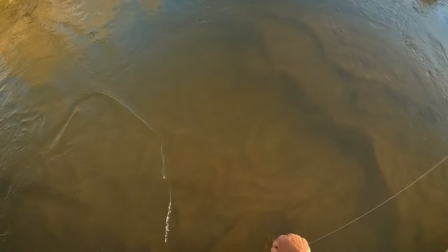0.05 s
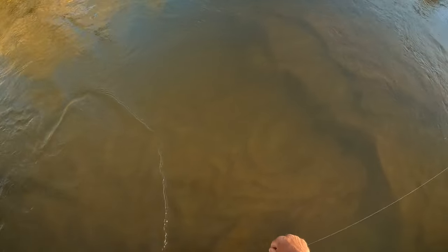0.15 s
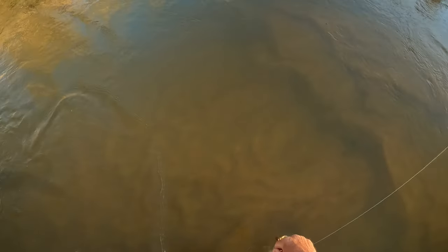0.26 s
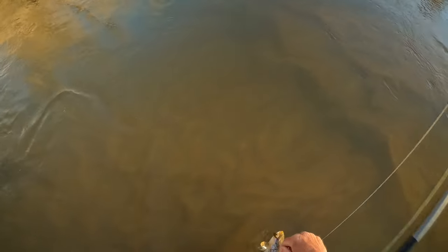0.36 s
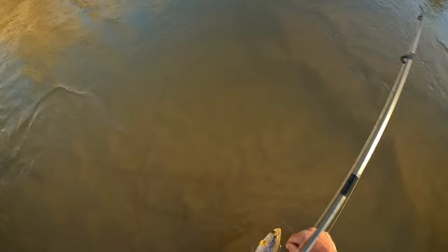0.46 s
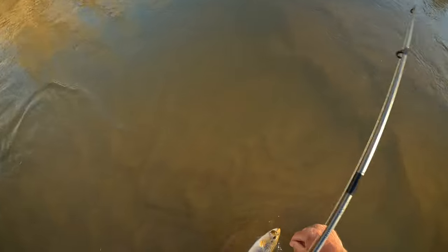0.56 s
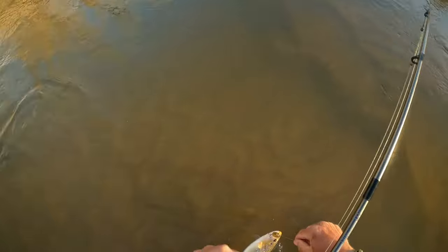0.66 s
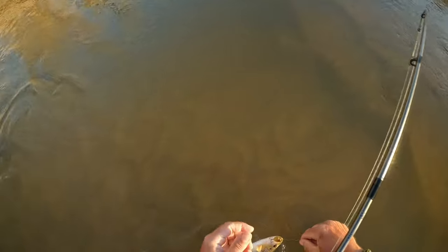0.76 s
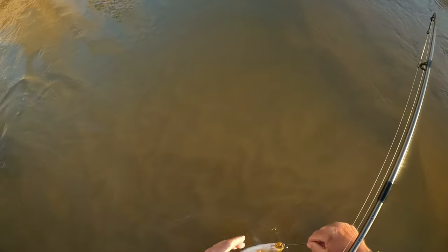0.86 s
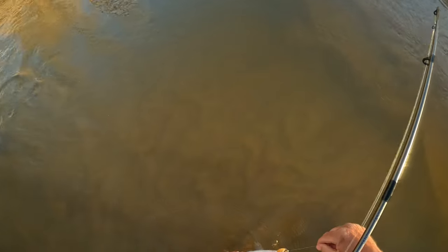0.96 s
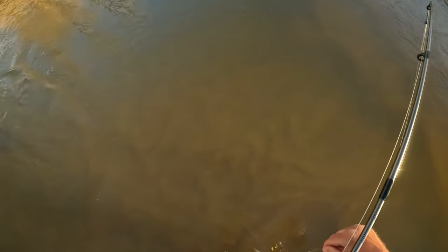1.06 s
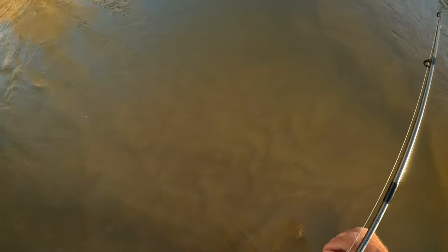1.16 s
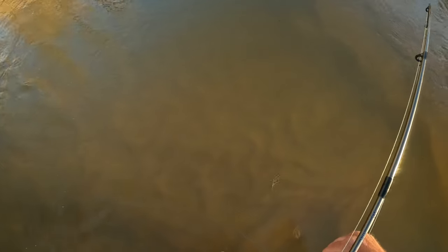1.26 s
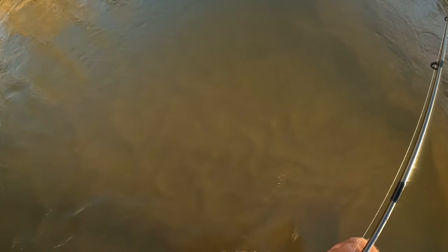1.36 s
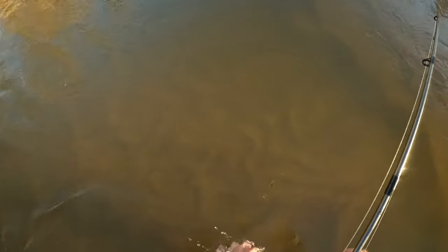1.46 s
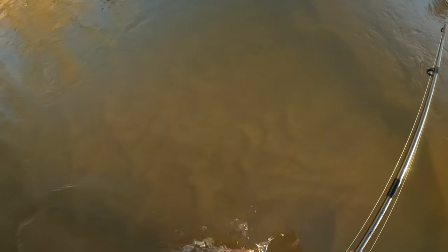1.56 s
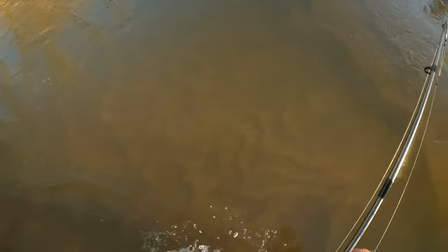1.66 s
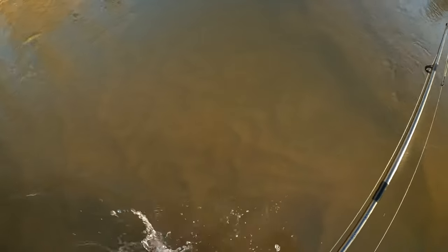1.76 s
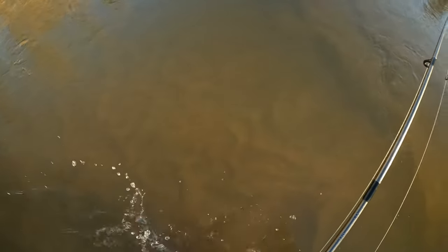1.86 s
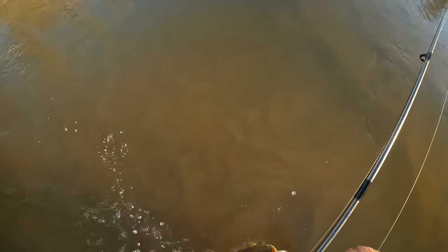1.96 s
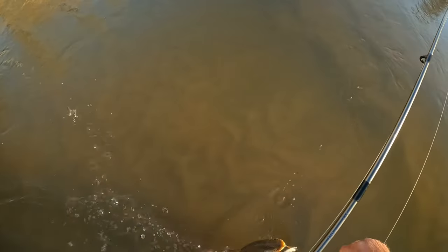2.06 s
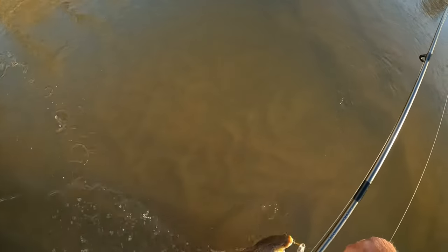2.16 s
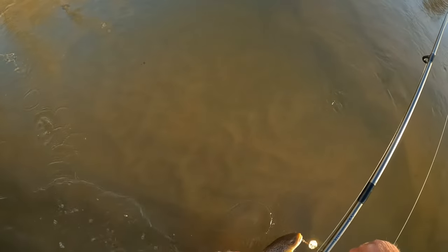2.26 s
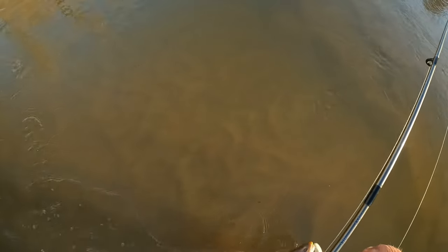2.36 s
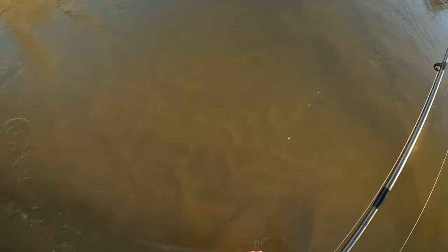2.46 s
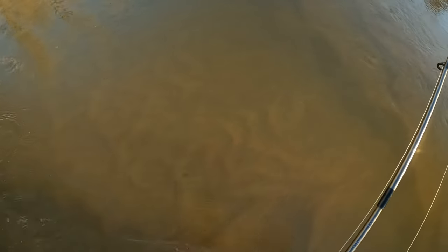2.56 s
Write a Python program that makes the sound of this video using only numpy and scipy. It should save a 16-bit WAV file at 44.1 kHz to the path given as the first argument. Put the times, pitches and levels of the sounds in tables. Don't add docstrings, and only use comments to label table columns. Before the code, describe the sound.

Close fish splashing on a stream: light line and finger knocks first, a sudden burst of slaps, churned water and faint metal jingle, then drops and a gulp, over quiet insects and wind buffeting.

```python
import sys
import numpy as np
from scipy import signal
from scipy.fft import rfft, irfft, next_fast_len
from scipy.io import wavfile
from scipy.ndimage import map_coordinates

SR = 44100
rng = np.random.default_rng(int(sys.argv[2]) if len(sys.argv) > 2 else 0)


def digitize_waveform(pressure):
    field = np.atleast_2d(pressure).T
    bounded = np.clip(field, -1, 1)
    quanta = np.round(bounded * 32767).astype(np.int16)
    wavfile.write(sys.argv[1], SR, quanta)


def invert_db(level):
    return 10 ** (np.asarray(level, dtype=float) / 20)


N = 114660

# frequency_hz, gain_db
CASE_COLOUR = [(6900, 2.5), (7700, -9), (13000, -9.5), (15000, -43)]


def unit(x):
    return x / np.sqrt(np.mean(x ** 2) + 1e-20)


def along(points, hz):
    f, v = np.transpose(points)
    return np.interp(np.log(hz + 1), np.log(f + 1), v)


def curves(rows):
    s, *cols = np.transpose(rows)
    return [np.interp(np.arange(N) / SR, s, c) for c in cols]


def wobble(rate):
    knots = rng.standard_normal(int(N * rate / SR) + 4)
    return map_coordinates(knots, [np.arange(N) * rate / SR])


def filtered(x, response):
    m = next_fast_len(x.shape[-1] + 8192)
    spectrum = rfft(x, m) * response(np.fft.rfftfreq(m, 1 / SR))
    return irfft(spectrum, m)[..., :x.shape[-1]]


def rush(spectrum, alike):
    def mid_side(hz):
        turn = np.arccos(np.clip(along(alike, hz), -1, 1)) / 2
        return invert_db(along(spectrum, hz)) * [np.cos(turn), np.sin(turn)]

    mid, side = filtered(rng.standard_normal((2, N)), mid_side)
    return unit(np.array([mid + side, mid - side]))


def add(track, s, sound, pan_db):
    part = track[:, round(s * SR):][:, :len(sound)]
    part += invert_db(np.array([[pan_db / 2], [-pan_db / 2]])) * sound[:part.shape[1]]


def grains(level_db, centre_hz, spread, cycles, size_db, count):
    u, t = rng.random((count, 3)), np.arange(500) / SR
    hz = np.clip(centre_hz * np.exp(spread * rng.standard_normal(count)), 300, 13000)[:, None]
    start = (u[:, 0] * (N - 500)).astype(int)
    size = invert_db(level_db[start] - size_db * np.log(u[:, 1] + 0.0019))[:, None]
    tone = np.sin(2 * np.pi * hz * t * (1 + 0.0036 * hz * t))
    shape = (1 - np.exp(-2 * hz * t)) * np.exp(-hz * t / cycles) * (1 - t / t[-1])
    ring = size * tone * shape
    where = (start[:, None] + np.arange(500)).ravel()
    pan_db = 3.8 * (u[:, 2:] - .5)
    return np.array([np.bincount(where, (ring * invert_db(side * pan_db)).ravel(), N) for side in (1, -1)])


def pockets():
    # start_s,
    # peak_db, pitch_hz, t60_s, pitch_rise_per_s
    early = [(.037, -32, 896, 0.083, 8.5), (0.111, -23.5, 1078, 0.021, -18), (0.11, -37.5, 146, 0.037, -2),
             (0.185, -37, 1254, 0.033, 19), (0.58, -16, 1380, 0.0067, 8), (0.6258, -24.5, 1117, 0.023, 6),
             (0.631, -33, 335, 0.035, -11), (0.641, -34, 175, 0.061, 1), (1.088, -45, 280, 0.025, 0),
             (1.409, -35, 297, 0.025, 5), (1.033, -46, 1050, 0.16, -2), (1.547, -34.5, 1165, 0.13, 6),
             (1.573, -10, 308, 0.0076, 90), (1.583, -23, 1770, 0.025, 8), (1.594, -28.5, 478, 0.064, 46.5),
             (1.616, -34.5, 517, 0.088, 8), (1.6827, 4, 4170, 0.0011, 3.3), (1.759, -19.5, 229, .05, 9),
             (1.7669, -2.5, 305, 0.031, -5.5), (1.775, -21.5, 260, 0.12, 5),
             (1.78, -23.5, 148, 0.093, 20.5), (1.802, -14, 459, 0.066, 52.5), (1.813, -28, 314, 0.15, 7.5),
             (1.849, -17, 560, 0.023, 5.8), (1.865, -28, 333, 0.098, 3), (1.873, -16.5, 905, 0.034, 8),
             (1.889, -13.5, 956, 0.018, 9), (1.892, -23.5, 337, 0.067, 3.2), (1.986, -29.5, 380, 0.027, 5),
             (2.012, -32, 1325, 0.071, 2.5)]
    # start_s, peak_db, pitch_hz, t60_s, pitch_rise_per_s
    late = [(2.064, -37, 895, 0.069, 5.5), (2.121, -41, 980, 0.068, 19.5), (2.057, -27, 1850, 0.021, -2),
            (2.211, -32.5, 1850, 0.033, 25), (2.315, -30.5, 1777, 0.043, 9.5),
            (2.328, -30, 1290, 0.044, 7.5), (2.524, -45.5, 480, 0.086, 7.5),
            (2.529, -31.5, 1200, 0.03, 2.5), (2.543, -32.5, 2100, 0.053, 11.5),
            (2.556, -34.5, 424, 0.71, 1.7), (2.59, -26, 457, 0.019, 9)]
    track, t = np.zeros((2, N)), np.arange(SR // 4) / SR
    shake = wobble(70), wobble(90)
    for s, db, hz, t60, rise in early + late:
        unsteady = np.clip(t / 0.051, 0, 1)
        sway, swell = [np.resize(v[round(s * SR):], len(t)) * unsteady for v in shake]
        tone = invert_db(0.83 * swell) * np.sin(2 * np.pi * hz * t * (1 + rise * t / 2) + 1.05 * sway)
        envelope = invert_db(db - 60 * t / t60) * (1 - np.exp(-t * hz / 0.44))
        add(track, s, envelope * tone, -.7)
    return track


def gulp():
    # time_s, pitch_hz, level_db
    hollow = [
        (2.295, 291, -64),
        (2.308, 289, -34.5),
        (2.355, 306, -41.5),
        (2.375, 302.4, -33),
        (2.414, 416, -35),
        (2.459, 636, -43.5),
    ]
    hz, level_db = curves(hollow)
    first_s, last_s = hollow[0][0], hollow[-1][0]
    span = np.abs(np.arange(N) / SR - (first_s + last_s) / 2) < (last_s - first_s) / 2
    turn = 2 * np.pi * np.cumsum(hz) / SR + 0.21 * wobble(70)
    level = invert_db(level_db - 6.5 + 1.4 * wobble(90))
    return span * level * (np.sin(turn) + 0.084 * np.sin(2 * turn))


def bursts(rows, sharp, wide_db, t60, rise_s):
    track, t = np.zeros((2, N)), np.arange(SR // 6) / SR
    for s, db, hz in rows:
        def colour(f):
            peak = 1j * f * hz / sharp / (hz * hz - f * f + 1j * f * hz / sharp)
            skirt = 1j * f / (400 + 1j * f) / (1 + 1j * f / (6.8 * hz))
            return peak + invert_db(wide_db) * skirt

        puff = rng.standard_normal(len(t)) * invert_db(-60 * t / t60) * (1 - np.exp(-t / rise_s))
        puff = filtered(puff, colour)
        add(track, s, invert_db(db) * puff / np.abs(puff).max(), rng.normal(-0.58, 1))
    return track


def slaps():
    # start_s, peak_db, centre_hz
    hits = [(1.488, -31, 3400), (1.513, -21, 4570), (1.561, -25, 2630), (1.685, -14, 5400),
            (1.736, -14.5, 7600), (1.763, -14.5, 4000), (1.737, -8, 11500), (1.891, -10.5, 3000),
            (2.056, -25.5, 2530), (2.211, -30, 2495), (2.262, -30.5, 5600), (2.3235, -23.5, 4020),
            (2.369, -26.5, 3850), (2.422, -32.5, 4540), (2.46, -35, 5150), (2.563, -21, 10900)]
    return bursts(hits, 3.6, wide_db=-18.5, t60=0.0088, rise_s=0.0011)


def drips():
    # start_s, peak_db, centre_hz
    falls = [(1.507, -46, 6570), (1.534, -33, 6460), (1.5717, -22, 6900), (1.586, -25, 6100),
             (1.606, -33, 4970), (1.6426, -22.5, 6500), (1.7114, -25.5, 2770), (1.8002, -22.5, 2400),
             (1.8511, -22, 6900), (1.881, -18.5, 2970), (1.9249, -19, 2500), (1.9538, -26, 2850),
             (1.98, -28.5, 6100), (2.146, -37.5, 3280), (2.18, -48, 3630), (2.2478, -44, 2020),
             (2.275, -35.5, 1500), (2.3545, -33.5, 2120), (2.3974, -34, 2470), (2.407, -44, 3570),
             (2.452, -34, 1920), (2.4603, -29.5, 1620), (2.469, -33, 1970), (2.471, -33, 1020),
             (2.592, -31, 3860)]
    return bursts(falls, 11, wide_db=-26, t60=0.013, rise_s=0.00063)


def churn():
    # time_s, agitation_db, gurgle_over_it_db
    stir = [(1.53, -57, -19), (1.575, -36.5, -5), (1.67, -30.5, -6.5), (1.7, -38.5, -47), (1.745, -34, -29),
            (1.768, -19.5, -22), (1.83, -35, 4.5), (1.89, -27, 1), (1.91, -32, 0.5), (1.99, -38.5, -11),
            (2.08, -46.5, 6), (2.16, -46, -31), (2.4, -48.5, -7), (2.5, -48, -11), (2.6, -34, -6)]
    # frequency_hz, density_db_per_hz
    spray_colour = [(590, -58), (1000, 6), (1310, 5), (6590, -6), (8140, -17), (11300, -11.5), (14400, -29)]
    # frequency_hz, likeness_0_to_1
    likeness = [(300, 1), (4000, 0.57), (13000, 0.51)]
    level_db, depth_db = curves(stir)
    level_db = level_db - 300 * np.clip(stir[0][0] - np.arange(N) / SR, 0, 1)
    ragged_db = 3.8 * wobble(190) + wobble(40.67)
    spray = invert_db(level_db - 5.5 + ragged_db) * rush(spray_colour, likeness)
    fizz = grains(level_db - 9, 4840, 0.58, 12.8, size_db=3.5, count=3000)
    drops = grains(level_db - 6.5, 1702, 0.402, 9.2, size_db=2.5, count=1000)
    gurgle = grains(level_db + depth_db + 1.5, 951, 0.259, 5.1, size_db=2.5, count=1300)
    return spray + gurgle + drops + through_case(fizz)


def lure():
    # start_s, peak_db
    jingles = [
        (1.705, -45),
        (1.736, -28),
        (1.776, -30),
        (1.824, -32),
        (2.279, -46),
    ]
    # pitch_hz, level_db, t60_s
    modes = [
        (8750, 4, 0.051),
        (12600, -2.5, 0.062),
        (13800, -3, .06),
    ]
    track, t = np.zeros((2, N)), np.arange(SR // 8) / SR
    for s, db in jingles:
        for side, side_db in enumerate((-4, 2.5)):
            ring = 0
            for hz, level, t60 in modes:
                decay = invert_db(level + rng.normal(0, 2.4) - 60 * t / t60)
                drift = np.cumsum(rng.normal(0, 0.056, len(t)))
                ring = ring + decay * np.sin(2 * np.pi * hz * t + 1.7 * side + drift)
            track[side, round(s * SR):][:len(t)] += invert_db(db + side_db) * (1 - np.exp(-t / 0.0021)) * ring
    return track


def ticks():
    # start_s, peak_db, centre_hz
    knocks = [(.103, -42, 8700), (.132, -40.5, 10700), (.184, -32, 8500), (.216, -37, 1780),
              (.283, -35, 3800), (.301, -34, 2250), (.468, -32.5, 760), (.579, -30.5, 3320),
              (.625, -26.5, 1100), (.644, -31, 1300), (.605, -35.5, 1370), (.718, -35.5, 860),
              (.851, -43.5, 263), (.88, -41.5, 1270), (.9, -41, 290), (.919, -38.5, 610),
              (.958, -46, 11000), (1.032, -41, 1520), (1.054, -36, 400), (1.249, -37.5, 910),
              (1.276, -38, 810), (1.286, -36.5, 7850), (1.0785, -23.5, 1090), (1.216, -31, 3450),
              (1.415, -30, 650)]
    return bursts(knocks, 1.7, wide_db=-23.5, t60=0.022, rise_s=0.00058)


def rubbing():
    # time_s, level_db
    rub = [(0, -59.5), (.36, -56), (.5, -48.5), (.56, -53), (.64, -38.5), (.69, -54.5), (1.075, -59.5),
           (1.085, -37), (1.13, -51), (1.18, -52.5), (1.42, -53.5), (1.5, -52.5)]
    # frequency_hz, density_db_per_hz
    scuff_colour = [(120, -57), (220, 8), (1300, 5.5), (2500, -3.5), (7000, -13.5), (7800, -23),
                    (12500, -32), (14500, -62)]
    level_db, = curves(rub)
    level_db = level_db - 200 * np.clip(np.arange(N) / SR - rub[-1][0], 0, 1)
    ragged_db = 3 * wobble(160)
    scuff = invert_db(level_db - 1.0 + ragged_db) * rush(scuff_colour, [(300, 0.97), (9000, 0.62)])
    return scuff + grains(level_db - 0.5, 1370, 0.546, 2.3, size_db=3.5, count=900)


def bank(x, t60):
    t = np.arange(SR // 6) / SR
    a, b = rng.standard_normal((2, len(t))) * invert_db(-60 * t / t60)
    tail = np.array([a + 0.42 * b, a - .25 * b])
    return signal.fftconvolve(x, tail / np.linalg.norm(tail[0]), axes=1)[:, :N]


def through_case(x):
    return filtered(x, lambda hz: invert_db(along(CASE_COLOUR, hz)))


def wind():
    # time_s, buffeting_db, brightness_db
    gusts = [(0, -34, -31), (.2, -31, -21.5), (.25, -22, -28), (.33, -22.5, -17), (.41, -24.5, -5),
             (.47, -28.5, -8), (.52, -25, -22), (.78, -30, -18.5), (.88, -26.5, -15.5), (1.0, -34, -16.5),
             (1.3, -34, -16.5), (1.7, -26, -37), (2.6, -39, -20)]
    # frequency_hz, density_db_per_hz
    rumble_colour = [(3, -31), (7, 19), (22, 11.5), (45, -8.5), (110, -54), (400, -140)]
    # frequency_hz, density_db_per_hz
    flutter_colour = [(30, -56), (60, 2.5), (100, -8.5), (350, -48.5), (1200, -120)]
    level_db, bright_db = curves(gusts)
    rumble = rush(rumble_colour, [(30, 0.97)])
    flutter = invert_db(bright_db + 2.0 * wobble(30.25) - 1.5) * rush(flutter_colour, [(30, 0.89)])
    return invert_db(level_db) * (rumble + flutter) * invert_db(np.array([[-3.], [2.5]]))


def stream():
    # frequency_hz, density_db_per_hz
    stream_colour = [(90, -3), (160, 3.5), (600, -14.5), (1350, -10.5), (2200, -19), (7000, -17),
                     (7800, -33.5), (12500, -28.5), (14500, -66)]
    level_db = -51 - 3 + .8 * wobble(15.45)
    return invert_db(level_db) * rush(stream_colour, [(300, 0.86), (9000, 0.65)])


def insects():
    centre_hz, width_hz, level_db = 2910, 324, -56.5
    band = lambda hz: np.exp(-((hz - centre_hz) / width_hz) ** 2)
    drone = unit(filtered(rng.standard_normal((2, N)), band))
    return invert_db(level_db + 0.93 * wobble(39.7)) * drone


def cricket():
    start_s, long_s, strokes_hz = 1.215, .29, 43.5
    pitch_hz, level_db = 3870, -53.5
    t = np.arange(N) / SR
    on = np.clip(np.minimum(t - start_s, start_s + long_s - t) / .03, 0, 1)
    beat = (t - start_s) * strokes_hz % 1
    pulse = np.sin(np.pi * np.clip(beat / 1.5, 0, 1)) ** 2
    tone = np.sin(2 * np.pi * np.cumsum(pitch_hz - 250 * (beat - .3)) / SR)
    return invert_db(level_db) * on * pulse * tone


def scene():
    near = pockets() + gulp() + slaps() + drips() + ticks()
    near = through_case(near + invert_db(-11.0) * bank(near, 0.093))
    background = stream() + insects() + cricket() + wind()
    return near + churn() + lure() + rubbing() + background


def roll_off(x):
    return signal.sosfilt(signal.butter(12, 14530, fs=SR, output="sos"), x)


def record(dry):
    return roll_off(dry)


dry = scene()
out = record(dry)
digitize_waveform(out)
```